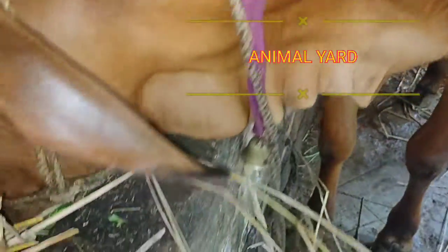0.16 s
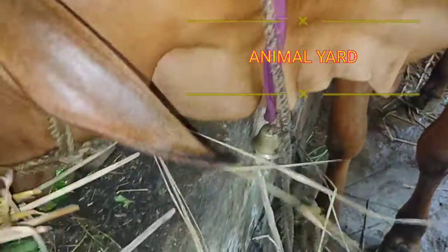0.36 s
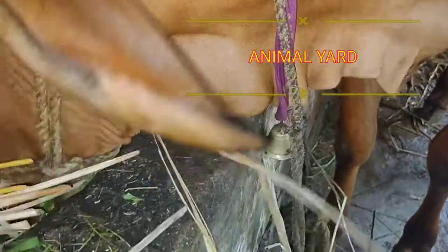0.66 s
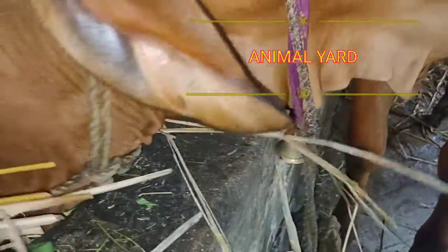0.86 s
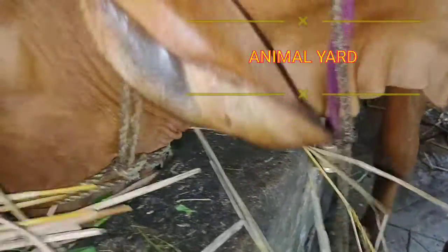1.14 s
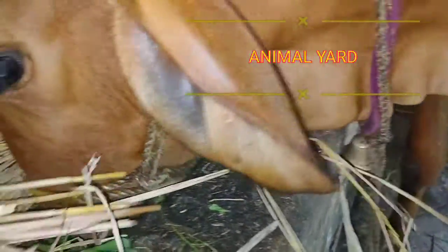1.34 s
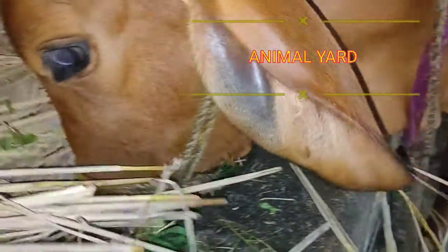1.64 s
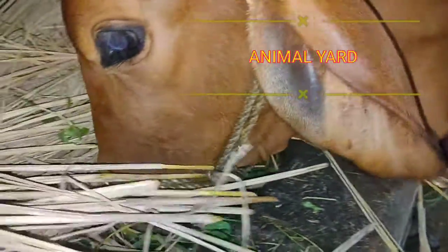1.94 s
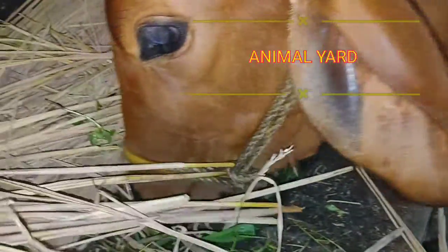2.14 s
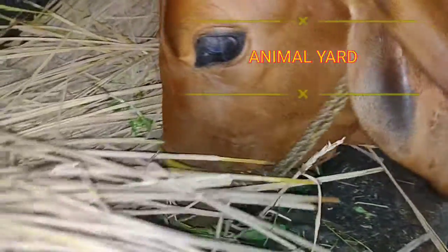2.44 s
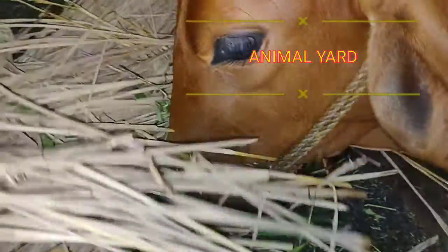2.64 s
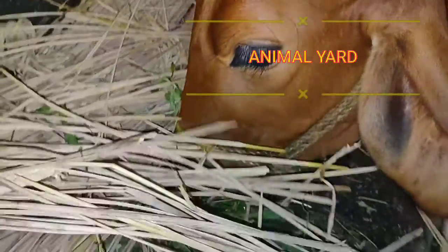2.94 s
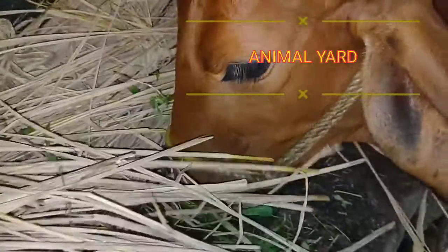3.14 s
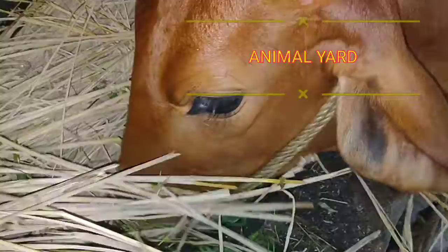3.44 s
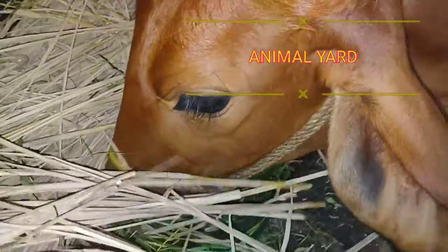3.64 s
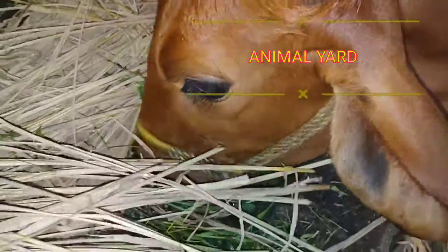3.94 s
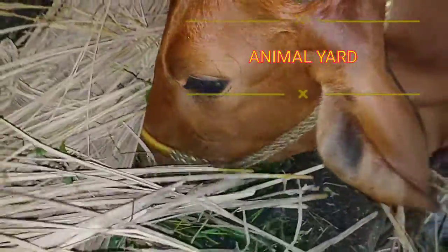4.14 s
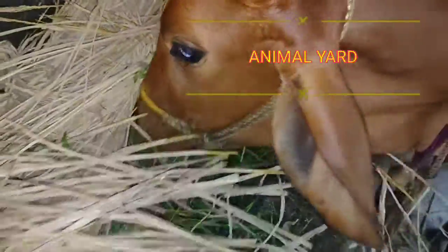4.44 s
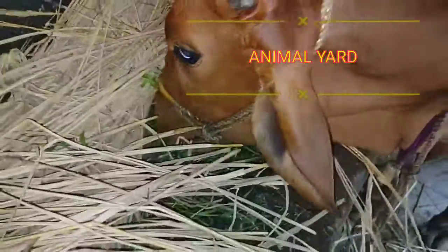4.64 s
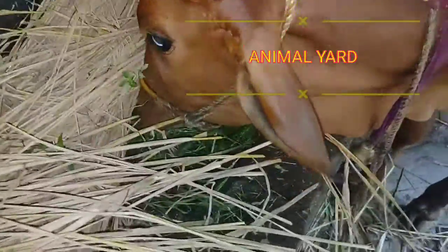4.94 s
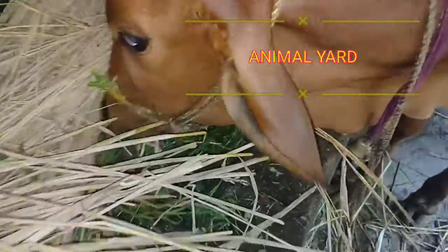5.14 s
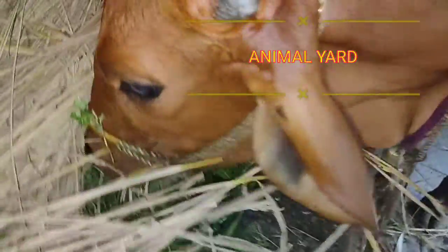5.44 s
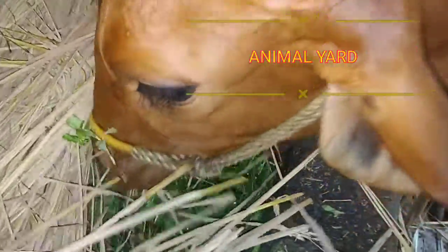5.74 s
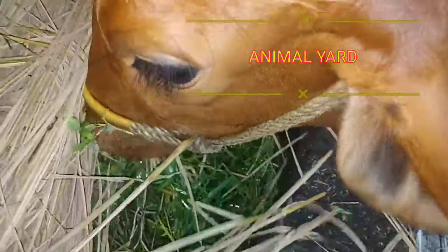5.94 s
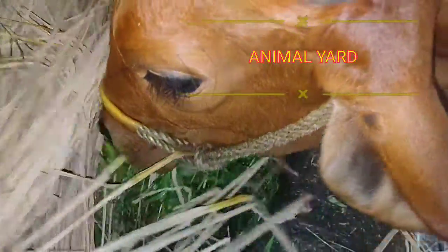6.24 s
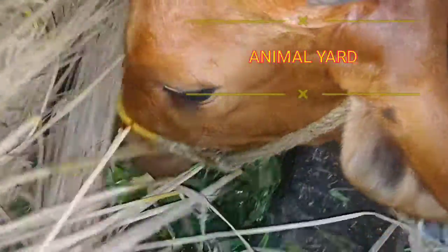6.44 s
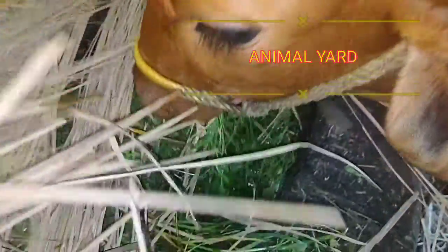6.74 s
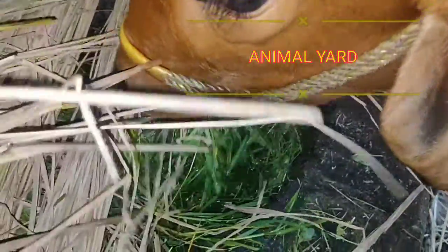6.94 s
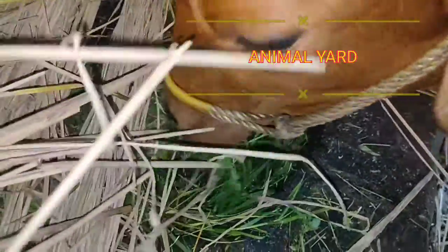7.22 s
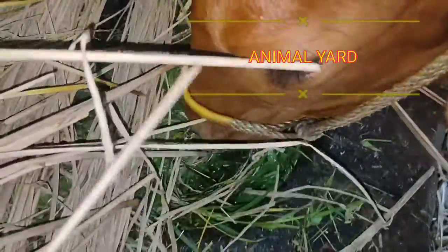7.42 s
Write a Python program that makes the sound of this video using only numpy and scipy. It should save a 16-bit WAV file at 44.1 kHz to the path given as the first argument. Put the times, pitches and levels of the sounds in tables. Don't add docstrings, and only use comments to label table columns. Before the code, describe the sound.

A cow noses through dry straw and grinds wet grass, stalks cracking close by, while a small bird chirps falling notes over a low pump drone.

```python
import sys
import numpy as np
from scipy import signal
from scipy.fft import rfft, irfft, next_fast_len
from scipy.io import wavfile
from scipy.ndimage import uniform_filter1d

SR = 44100
rng = np.random.default_rng(int(sys.argv[2]) if len(sys.argv) > 2 else 0)


def log_audio(samples):
    frames = np.atleast_2d(samples).T
    limited = np.clip(frames, -1, 1)
    pcm = np.round(limited * 32767).astype(np.int16)
    wavfile.write(sys.argv[1], SR, pcm)


def gain_from_db(level_db):
    decades = np.asarray(level_db, float) / 20
    return 10 ** decades


N = 334258
TIME = np.arange(N) / SR
SLOW_TIME = TIME[::64]


def unit(x):
    return x / np.sqrt(np.mean(x ** 2))


def walk(rate_hz):
    hold = int(SR / rate_hz)
    steps = np.repeat(rng.standard_normal(N // hold + 1), hold)
    slides = uniform_filter1d(uniform_filter1d(steps, hold), hold)
    return unit(slides[:N])


def patchy(x, shape, patchy_db, rate_hz):
    size = next_fast_len(N)
    octave = np.log2(np.arange(1, size // 2 + 2) * SR / size)
    shape_hz, shape_db = np.transpose(shape)
    at = np.log2(shape_hz)
    wave = rfft(x, size) * gain_from_db(np.interp(octave, at, shape_db, left=-200, right=-200))
    out = np.zeros(N)
    for third in np.arange(np.floor(3 * at[0]), 3 * at[-1] + 1):
        share = np.clip(1 - abs(3 * octave - third), 0, 1)
        out += gain_from_db(patchy_db * walk(rate_hz)) * irfft(wave * share)[:N]
    return unit(out)


def grains(per_s, spread_db, tail_s):
    hit = rng.random(N) < per_s / SR
    size = np.minimum(rng.exponential(1, N), 4)
    energy = hit * gain_from_db(2 * spread_db * size)
    puffs = signal.lfilter([1], [1, -np.exp(-1 / (tail_s * SR))], energy)
    return np.sqrt(puffs) * rng.standard_normal(N)


def add(out, start_s, x):
    i = int(start_s * SR)
    out[i:i + len(x)] += x[:len(out) - i]


def bandpass(x, order, low_hz, high_hz):
    return signal.sosfilt(signal.butter(order, [low_hz, high_hz], "bandpass", fs=SR, output="sos"), x)


def ring(hz, t60_s, rise_s):
    t = TIME[:SR // 8]
    fade = np.exp(-np.log(1000) * t / t60_s)
    x = (1 - np.exp(-t / rise_s)) * fade * np.sin(2 * np.pi * hz * t)
    return x / abs(x).max()


def swells(start_s, held_s, db, rise_db_s, fall_db_s):
    t = SLOW_TIME - start_s[:, None]
    rise = rise_db_s * np.minimum(t, 0)
    fall = fall_db_s * np.maximum(t - held_s[:, None], 0)
    return db[:, None] + rise - fall


def smooth(control):
    return np.interp(TIME, SLOW_TIME, uniform_filter1d(control, size=12))


# start_s, level_db, held_s, thick_stalks_db (relative to level_db)
MUZZLE_PUSHES = [(0.03, -55.5, 0.038, -4), (0.15, -44, 0.013, -11.5), (0.44, -44, 0.072, -12.5),
                 (0.66, -43, 0.097, -14), (0.8, -41, 0.14, -11), (1.051, -44.5, 0.04, -9),
                 (1.299, -42.5, 0.32, -18), (1.738, -42, 0.0069, -9), (2.04, -41, .12, -11.5),
                 (2.4, -40, 0.055, -7.5), (2.6, -39, 0.069, -11.5), (2.8, -44, 0.042, -8),
                 (3.018, -41.5, .01, -7), (3.11, -44, 0.01, -7), (3.52, -40, 0.15, -8.5),
                 (3.95, -44, 0.45, -6.5), (4.58, -43, 0.13, -11.5), (4.719, -41, 0.12, -7.5),
                 (5.188, -40.5, 0.24, -10.5), (5.62, -43.5, 0.24, -5.5), (5.88, -36.5, 0.038, -13),
                 (6.03, -36, .05, -10.5), (6.118, -32.5, 0.24, -11.5), (6.45, -35, 0.24, -10.5),
                 (6.86, -33.5, 0.027, -9), (7.13, -42, 0.028, -9.5), (7.29, -43, 0.067, -5),
                 (7.451, -43, 0.0067, -5), (7.57, -41.5, .02, -16)]
# start_s, held_s, hush_db
HEAD_RESTS = [
    (0.298, 0.061, 7.5),
    (1.85, 0.049, 7),
    (3.42, 0.046, 2.5),
    (5.08, 0.016, -2),
]


def pushes():
    rise_db_s, fall_db_s, rest_db_s, still_db = 134, 46, 115, -45.5
    start_s, db, held_s, stalk_db = np.transpose(MUZZLE_PUSHES)
    bright = swells(start_s, held_s, db, rise_db_s, fall_db_s).max(axis=0)
    bright = np.maximum(bright, still_db)
    coarse = swells(start_s, held_s, db + stalk_db, rise_db_s * 0.66, fall_db_s * 1.73).max(axis=0)
    hush = swells(*np.transpose(HEAD_RESTS), rest_db_s, rest_db_s).max(axis=0)
    hush = np.maximum(hush, 0)
    return bright - hush, coarse - 1.5 * hush


# pitch_hz, level_db (per Hz)
BLADE_TONE = [(1350, -34), (2300, -4.5), (3110, -1), (4620, -4), (6770, 2), (7580, -3.5), (8300, -27),
              (10800, -64.5)]
# pitch_hz, level_db (per Hz)
STALK_TONE = [(900, -24.5), (1250, 0), (1600, -1), (2300, -3), (2900, -7.5)]


def straw():
    blades_db, stalks_db = pushes()
    stalks_db = np.maximum(stalks_db, strokes()[1] - 5.5)
    blades_db, stalks_db = smooth(blades_db), smooth(stalks_db)
    fibres = grains(1300, spread_db=0.48, tail_s=0.0078)
    blades = gain_from_db(blades_db + 1.46) * patchy(fibres, BLADE_TONE, patchy_db=-1.93, rate_hz=8.2)
    stalks = gain_from_db(stalks_db + 0.14) * patchy(fibres, STALK_TONE, patchy_db=2.16, rate_hz=11)
    return blades + stalks


# start_s, held_s, cheek_db, stems_db, mouth_hz (as it starts to close)
JAW_STROKES = [(0.0, 0.12, -50.5, -59.5, 334.5), (0.849, 0.083, -50.5, -48, 400.1),
               (1.071, .04, -59, -53, 517), (1.32, 0.053, -61, -55.5, 501), (1.55, 0.069, -56, -54, 450),
               (1.63, 0.066, -50, -49, 480.7), (1.715, 0.048, -60, -43, 420), (1.925, 0.022, -75, -53, 643),
               (2.25, 0.057, -46.5, -52, 480), (2.39, 0.12, -42, -46, 420), (2.69, .06, -75, -51.5, 670),
               (3.09, 0.07, -39, -50.5, 480), (3.18, .11, -41.5, -46, 420), (4.035, .06, -49, -42, 620),
               (4.1, 0.081, -43.5, -50, 400), (4.7, .14, -48.5, -57, 520), (4.855, 0.1, -42.5, -52, 380),
               (4.995, 0.063, -58, -47.5, 728.5), (5.61, 0.12, -45, -51, 340),
               (6.13, 0.074, -44, -46.5, 444.5), (6.248, 0.13, -44, -46.5, 370),
               (6.5, .07, -50, -52.5, 270), (7.0, .11, -49, -54.5, 517.7), (7.22, 0.11, -42, -56, 302.3)]


def strokes():
    rise_db_s, fall_db_s, cheek_rest_db = 600, 171, -69.5
    closing_hz_s, shut_hz = 988, 246
    start_s, held_s, cheek_db, stems_db, open_hz = np.transpose(JAW_STROKES)
    cheek = swells(start_s, held_s, cheek_db, rise_db_s, fall_db_s).max(axis=0)
    stems = swells(start_s, held_s, stems_db, rise_db_s, fall_db_s)
    now = stems.argmax(axis=0)
    since_s = np.maximum(SLOW_TIME - start_s[now], 0)
    mouth_hz = np.maximum(open_hz[now] - closing_hz_s * since_s, shut_hz)
    return np.maximum(cheek, cheek_rest_db), stems.max(axis=0), mouth_hz


# pitch_hz, level_db (per Hz)
CHEEK_TONE = [(190, -44), (230, 2), (350, 2), (500, -5), (600, -5.5)]
# pitch_hz, level_db (per Hz)
STEM_TONE = [(480, -13), (580, -3.5), (780, -1), (1120, 2), (1250, -1), (1450, -34)]


def jaw():
    mouth_width_hz, mouth_level_db = 70, -2.5
    cheek_db, stems_db, mouth_hz = strokes()
    pushed_db = np.maximum(pushes()[1] - 5.5, -74)
    stems_db = np.maximum(stems_db, pushed_db)
    cheek_db, stems_db, mouth_hz = smooth(cheek_db), smooth(stems_db), smooth(mouth_hz)
    crunch = grains(1000, spread_db=4.8, tail_s=0.0061)
    cheek = gain_from_db(cheek_db - 5.5) * patchy(crunch, CHEEK_TONE, patchy_db=5, rate_hz=21)
    stems = gain_from_db(stems_db - 0.5) * patchy(crunch, STEM_TONE, patchy_db=2.15, rate_hz=12)
    breath = unit(crunch) + 1.4 * rng.standard_normal(N)
    slow = unit(signal.sosfilt(signal.butter(2, mouth_width_hz, fs=SR, output="sos"), breath))
    mouth_db = np.where(mouth_hz < 530, cheek_db, stems_db + 1.5)
    mouth_db = uniform_filter1d(mouth_db, size=800) + mouth_level_db
    mouth = gain_from_db(mouth_db) * slow * np.sin(2 * np.pi * np.cumsum(mouth_hz) / SR)
    return cheek + stems + mouth


# start_s, peak_db, ring_hz, tick_db (bright tick, relative)
STALK_CRACKS = [(0.146, -35.5, 1410, -9), (0.445, -42, 2800, 0), (1.067, -27.5, 2310, -13),
                (1.444, -49, 2760, -5), (1.647, -35.5, 566, -16), (1.719, -33, 1060, -9),
                (1.928, -32, 1113, 3), (2.25, -33, 420, -14), (2.472, -31, 422, -13),
                (2.698, -27.5, 1105, -13), (2.724, -25, 1148, -12), (3.009, -27, 1740, -17),
                (3.104, -26.5, 425, -20), (3.237, -26, 358.3, -13), (3.28, -24.5, 1020, -20),
                (4.049, -33.5, 502, -17), (4.252, -25.5, 2260, -16), (4.275, -21, 2686, -10),
                (4.859, -32, 365, -11), (4.989, -30.5, 667, -14), (5.029, -32.5, 736, -2.5),
                (6.14, -29, 455, 14), (6.611, -31.5, 2557, 4.5), (7.22, -23, 2650, -2),
                (7.282, -26, 950, -2), (7.31, -24, 1675, -6), (7.365, -22, 2860, -2),
                (7.454, -26, 2876, -9)]
# pitch_hz, level_db, t60_s
SNAP_RINGS = [
    (6520, -17, 0.025),
    (5070, -20.5, 0.0045),
    (3600, -21, 0.0077),
    (2410, -17.5, 0.0017),
    (1210, -43.5, 0.027),
]


def cracks():
    out = np.zeros(N)
    for start_s, db, hz, tick_db in STALK_CRACKS:
        t60_s = 36.6 / hz
        body = 0.5 * ring(hz, t60_s, 0.0011)
        body += 0.25 * ring(1.6 * hz, t60_s / 2, 0.0013)
        body += 0.2 * ring(0.67 * hz, t60_s, 0.00076)
        tick = gain_from_db(tick_db - 16) * ring(3800, 0.008, 0.0003)
        add(out, start_s, gain_from_db(db) * (body + tick))
        splinter = 2 * rng.standard_normal(900) * np.exp(-TIME[:900] / 0.003)
        add(out, start_s, gain_from_db(db - 16.5) * bandpass(splinter, 1, hz / 2, 1.2 * hz))
    snap_s = 6.8305
    add(out, snap_s, gain_from_db(-16) * rng.standard_normal(600) * np.exp(-TIME[:600] / 0.002))
    snap = sum(gain_from_db(db) * ring(hz, t60_s, 0.00044) for hz, db, t60_s in SNAP_RINGS)
    for late_s, late_db in ((0, 0.5), (0.0009, -4.5), (0.003, -7)):
        add(out, snap_s + late_s, gain_from_db(late_db) * snap)
    return out


# start_s, peak_db, ring_hz
SWALLOW_BUBBLES = [
    (2.871, -36.5, 139),
    (2.909, -29.5, 144),
    (2.95, -30, 151),
    (2.994, -30, 128),
    (3.038, -32, 130),
    (3.08, -34, 125),
]


def throat():
    out = np.zeros(N)
    for start_s, db, hz in SWALLOW_BUBBLES:
        thump = ring(hz, 0.057, 0.0068) + 0.093 * ring(1.39 * hz, 0.33, 0.014)
        add(out, start_s, gain_from_db(db + 5.5) * thump)
    return out


# start_s, length_s, first_hz, held_hz, level_db
STAMMER_NOTES = [
    (5.27, 0.025, 4250, 4250, -34.5),
    (5.29, 0.016, 3740, 3900, -28),
    (5.309, 0.017, 3800, 3970, -31.5),
    (5.335, .035, 3750, 3980, -29.5),
    (5.373, 0.03, 3840, 3910, -40.5),
    (5.3, 0.068, 3280, 3350, -39.5),
    (5.672, 0.02, 4100, 4060, -29),
]
HOOK_NOTES = [
    (6.159, 0.08, 3904, 2853, -30.5),
    (6.87, .04, 4170, 3010, -19.5),
    (6.942, 0.047, 3260, 2618, -25.5),
    (7.122, 0.037, 4000, 3257, -21.5),
    (7.347, .036, 3982, 2823, -24.5),
    (7.404, .04, 3490, 2788, -27.5),
]
SWOOP_NOTES = [
    (3.839, .05, 2830, 2790, -45),
    (4.329, 0.049, 4450, 4450, -52),
    (5.451, 0.042, 3090, 2570, -33.5),
    (5.84, 0.044, 4430, 2824, -22.5),
    (6.003, 0.042, 4060, 2906, -22),
    (6.316, 0.055, 4400, 2916, -23),
    (7.156, 0.041, 4000, 2600, -26.5),
]
DIVE_NOTES = [
    (5.506, .029, 3292, 3360, -22),
    (5.662, .073, 4660, 3070, -23),
]
BUZZ_NOTES = [
    (6.481, 0.061, 4110, 3250, -23),
    (6.683, 0.051, 3600, 3292, -24.5),
]
# drop_s, drop_curve, closing_flick_hz, closing_fade_db, buzz (share)
NOTE_KINDS = [
    (.008, 1.2, 32.5, -4.5, .8),
    (0.019, 1.302, 351.5, -9, 0.06),
    (.045, 2.5, -250, -12.5, 0.06),
    (0.04, 1.8, -800, -4, 0.2),
    (0.0188, 1.43, 52, -10.5, 1.16),
]


def bird():
    flick_s, waver_hz, buzz_hz, buzz_depth_hz = 0.015, 60, 185, 190
    off_pitch_db_khz = -9.5
    out, flutter, waver = np.zeros(N), walk(260), walk(300)
    shake = buzz_depth_hz * np.sin(2 * np.pi * buzz_hz * TIME + walk(60))
    song = (STAMMER_NOTES, HOOK_NOTES, SWOOP_NOTES, DIVE_NOTES, BUZZ_NOTES)
    for notes, (drop_s, curve, flick_hz, fade_db, buzz) in zip(song, NOTE_KINDS):
        for start_s, length_s, first_hz, held_hz, db in notes:
            i = np.arange(int(start_s * SR), int((start_s + length_s) * SR))
            t = TIME[:len(i)]
            edge = np.clip(np.minimum(t, length_s - t) / 0.003, 0, 1)
            opening = np.clip(1 - t / drop_s, 0, 1) ** curve
            closing = np.clip(1 - (length_s - t) / flick_s, 0, 1)
            pitch = held_hz + (first_hz - held_hz) * opening + flick_hz * closing
            pitch = uniform_filter1d(pitch, size=100) + buzz * shake[i] + waver_hz * waver[i]
            beak_db = off_pitch_db_khz * abs(first_hz - held_hz) / 1000 * opening
            gain = edge * gain_from_db(db + beak_db + fade_db * closing + 3.2 * flutter[i])
            add(out, start_s, gain * np.sin(2 * np.pi * np.cumsum(pitch) / SR))
    return out


# delay_s, level_db
CLOSE_ECHOES = [
    (.007, -6.5),
    (.046, -19.5),
]


def yard(x):
    t60_s, tail_db = 0.58, -1.5
    t = TIME[:SR // 2]
    fade = (1 - np.exp(-t / 0.0046)) * np.exp(-np.log(1000) * t / t60_s)
    tail = rng.standard_normal(len(t)) * fade
    tail = gain_from_db(tail_db) * tail / np.sqrt(np.sum(tail ** 2))
    for delay_s, db in CLOSE_ECHOES:
        add(tail, delay_s, gain_from_db(db) * np.ones(1))
    return signal.fftconvolve(x, tail)[:N]


# time_s, drone_db, rumble_db
HUM_LEVELS = [(0.0, -44.5, -47), (0.8, -41, -48), (1.15, -42, -44.5), (1.23, -53, -48), (1.34, -37, -44.5),
              (1.72, -56, -50.5), (1.82, -41, -45.5), (2.9, -45, -41.5), (3.45, -45.5, -45),
              (3.62, -38.5, -44), (4.5, -40, -42.5), (5.1, -42.5, -44), (5.75, -38, -35.5),
              (6.3, -39, -41.5), (6.62, -39.5, -36), (6.71, -33, -40.5), (6.95, -41.5, -40),
              (7.3, -38.5, -35.5)]
# pitch_hz, level_db (per Hz)
RUMBLE_TONE = [(14, -33.5), (21, -1), (38, -28.5), (80, -5.5), (105, 10), (132, 6), (208, -15), (225, -37)]
# pitch_hz, width_hz, level_db
STEADY_BANDS = [
    (200, 12, -59),
    (243, 10, -70),
    (300, 14, -69),
    (630, 90, -61),
    (2780, 100, -58),
]


def background():
    time_s, drone_db, rumble_db = np.transpose(HUM_LEVELS)
    drone_db, rumble_db = np.interp(TIME, time_s, drone_db), np.interp(TIME, time_s, rumble_db)
    pitch_hz = 102.1 + 2.16 * walk(18)
    phase = 2 * np.pi * np.cumsum(pitch_hz) / SR
    beat = (0.8 + 0.5 * walk(32)) * np.sin(phase) + 0.5 * walk(32) * np.cos(phase)
    drone = gain_from_db(drone_db + 4) * beat
    rumble = patchy(rng.standard_normal(N), RUMBLE_TONE, patchy_db=-4.5, rate_hz=9)
    out = drone + gain_from_db(rumble_db - 1) * rumble
    for hz, width_hz, db in STEADY_BANDS:
        hum = unit(bandpass(rng.standard_normal(N), 2, hz - width_hz / 2, hz + width_hz / 2))
        out += gain_from_db(db - 3.5 + 3.1 * walk(4)) * hum
    return out


def scene():
    song, snaps = bird(), cracks()
    echoes = yard(song + 0.27 * snaps)
    mono = straw() + jaw() + snaps + throat() + song + echoes + background()
    return np.array([mono, mono])


def low_pass(x):
    return signal.sosfilt(signal.butter(12, 8620, fs=SR, output="sos"), x)


def record(dry):
    top_hz = 8140
    mix = signal.sosfilt(signal.ellip(8, 0.2, 80, top_hz, fs=SR, output="sos"), dry)
    return low_pass(mix)


dry = scene()
out = record(dry)
log_audio(out)
```